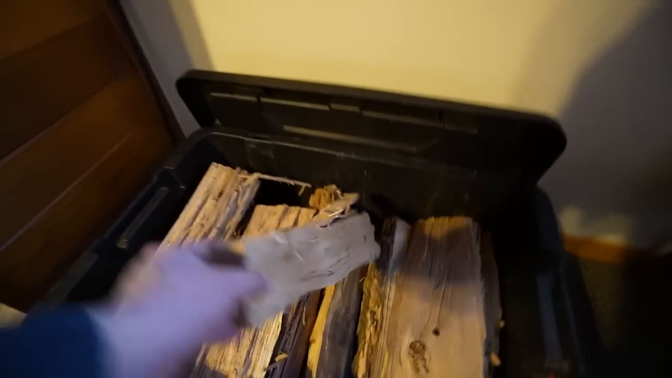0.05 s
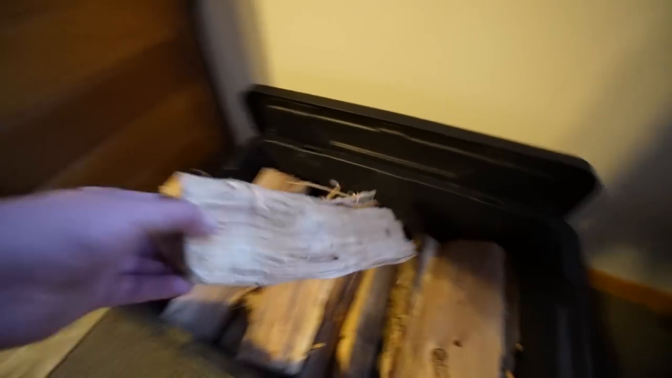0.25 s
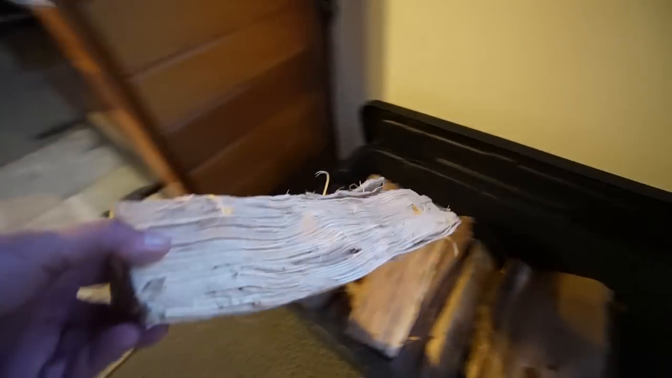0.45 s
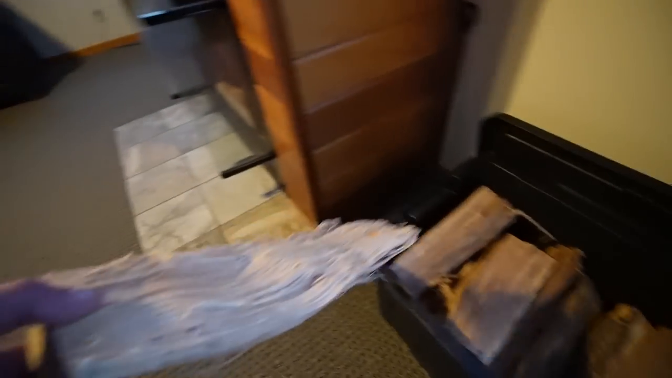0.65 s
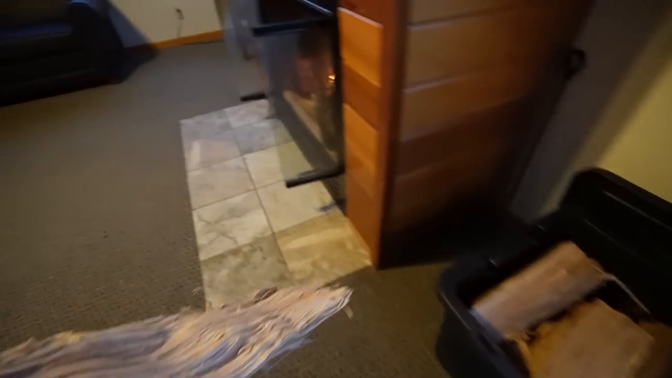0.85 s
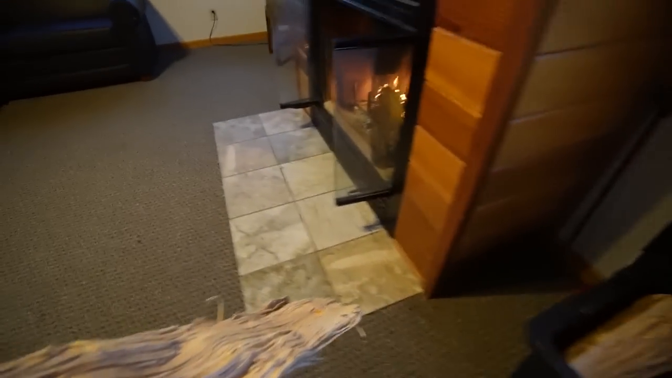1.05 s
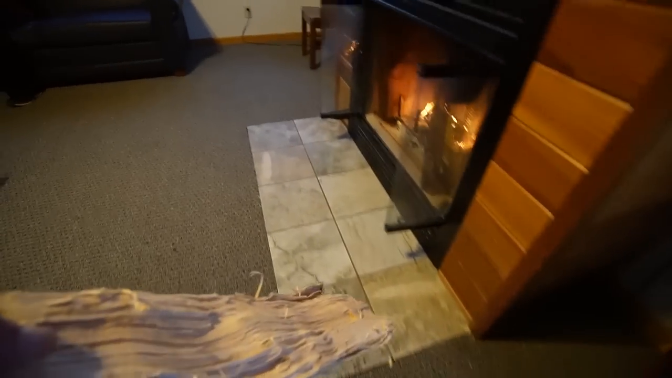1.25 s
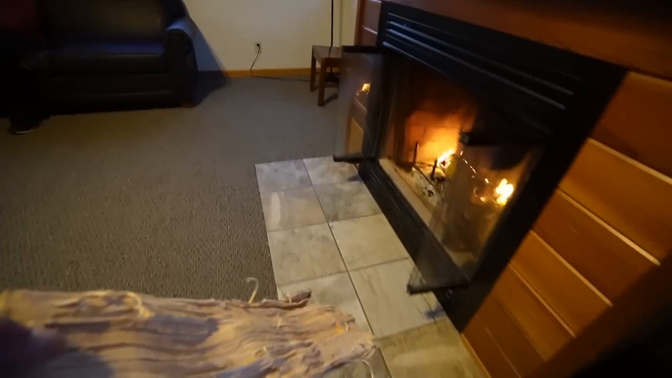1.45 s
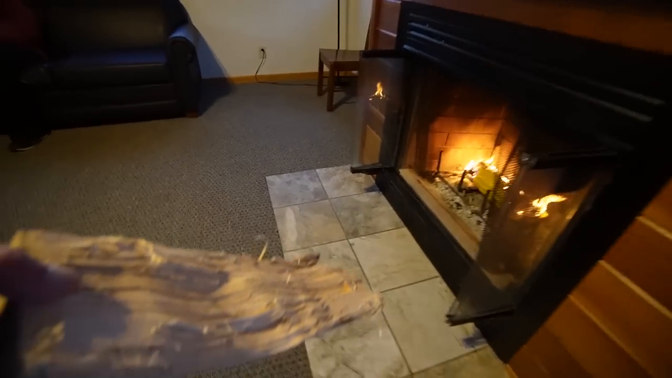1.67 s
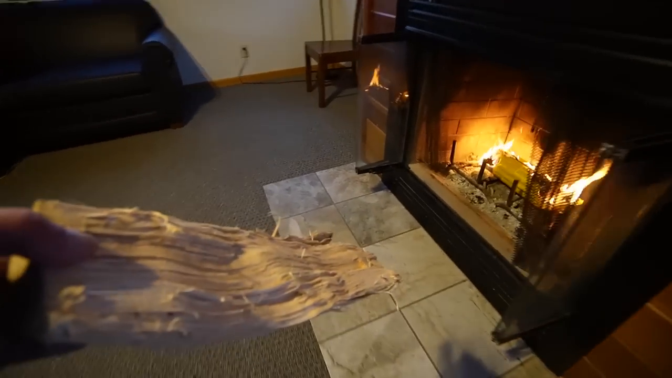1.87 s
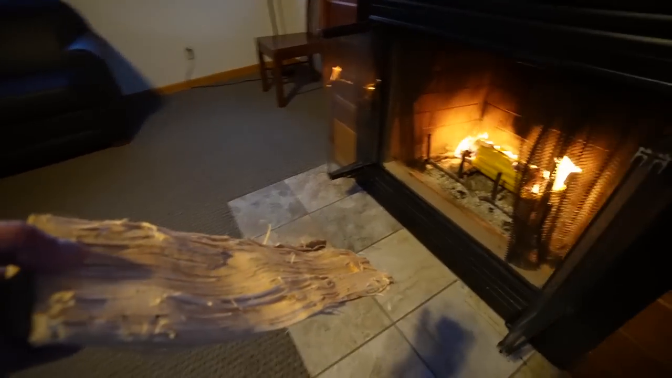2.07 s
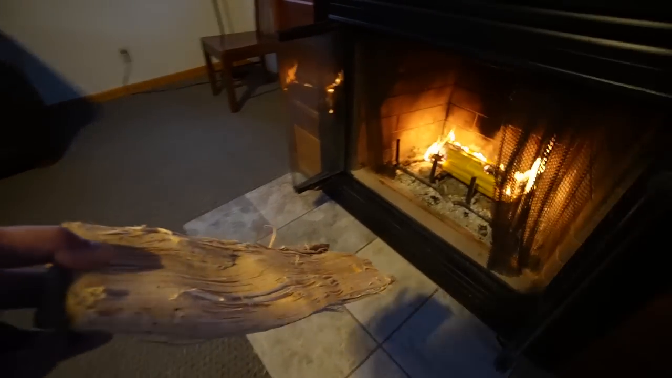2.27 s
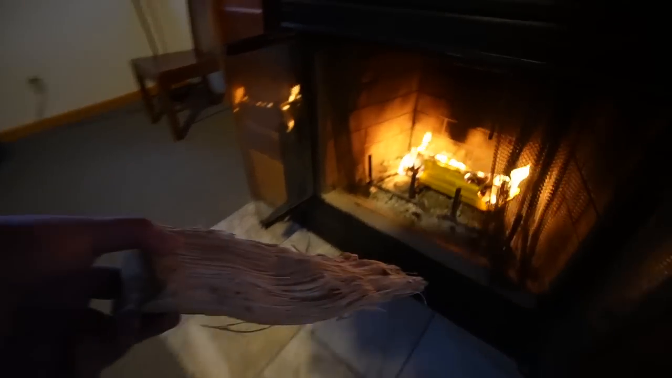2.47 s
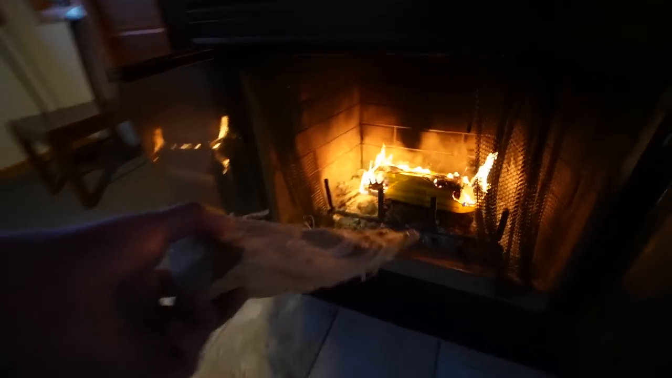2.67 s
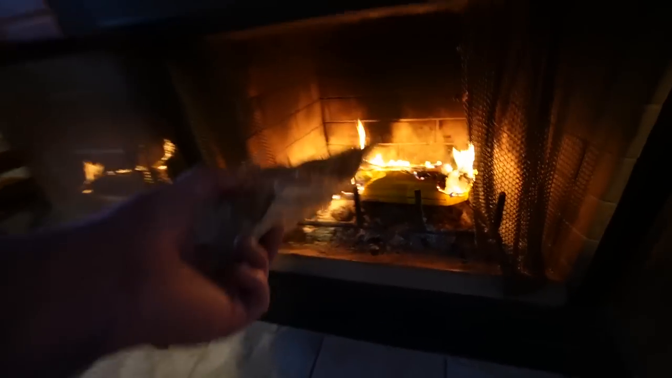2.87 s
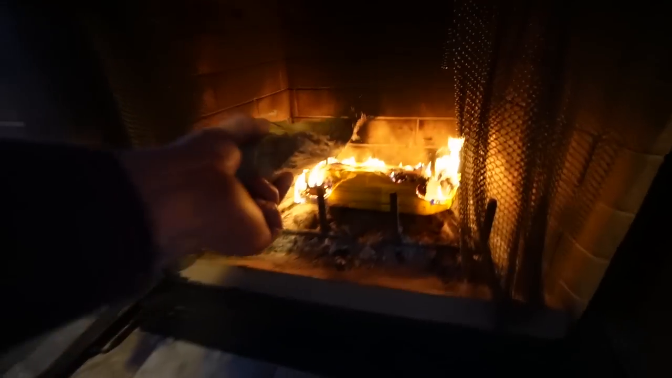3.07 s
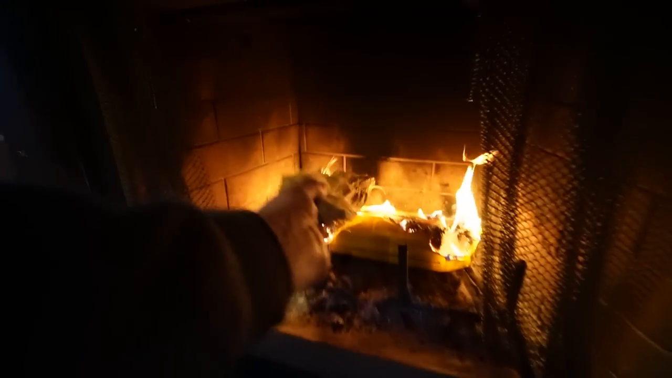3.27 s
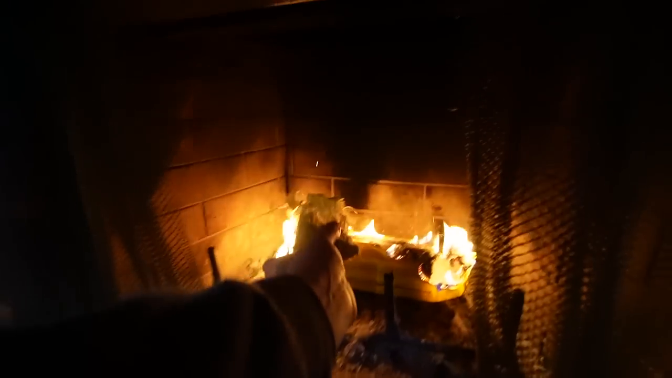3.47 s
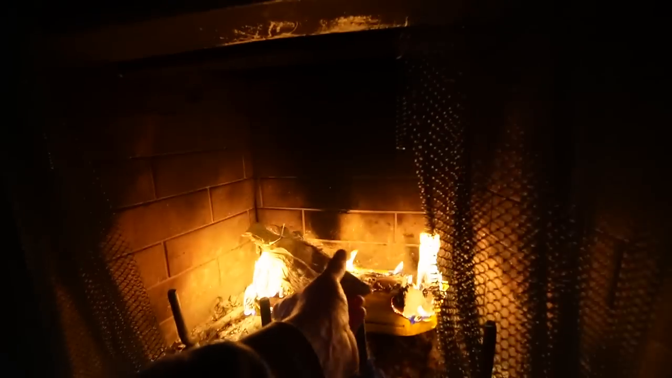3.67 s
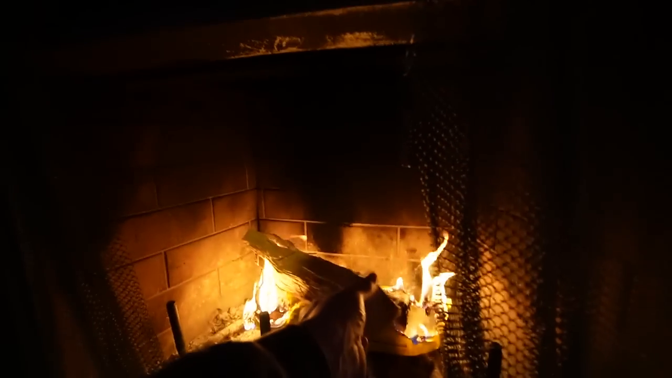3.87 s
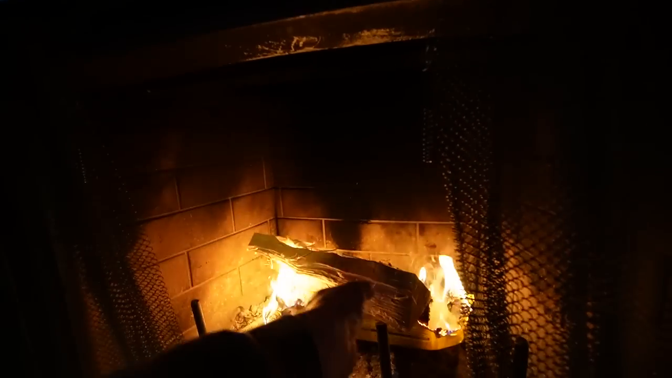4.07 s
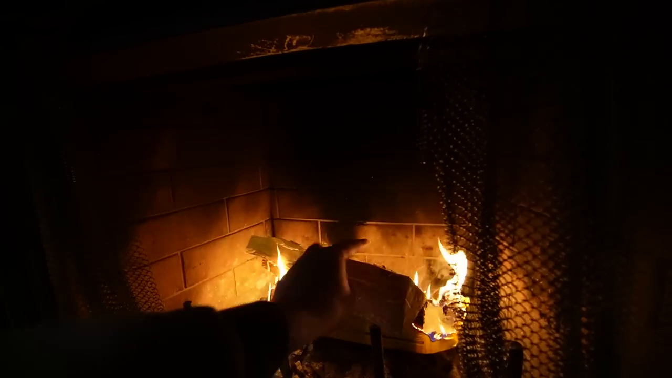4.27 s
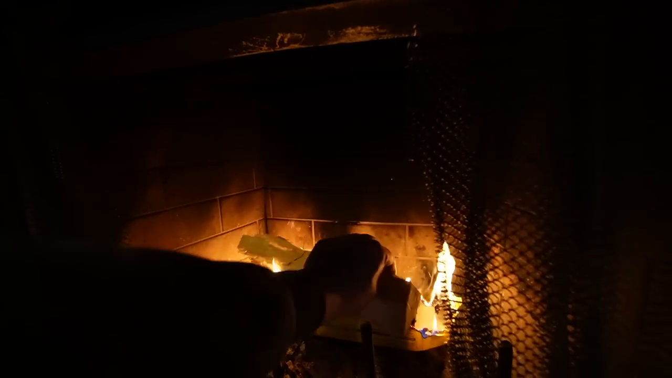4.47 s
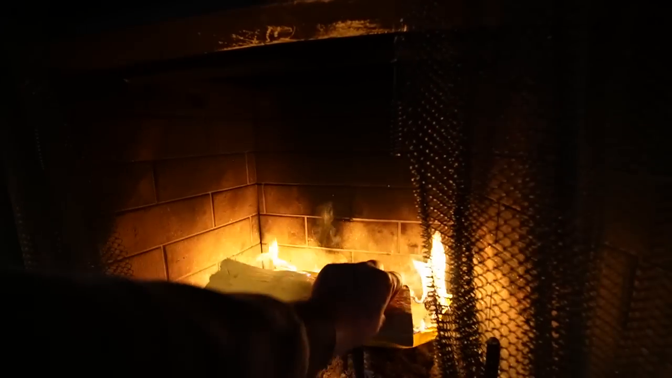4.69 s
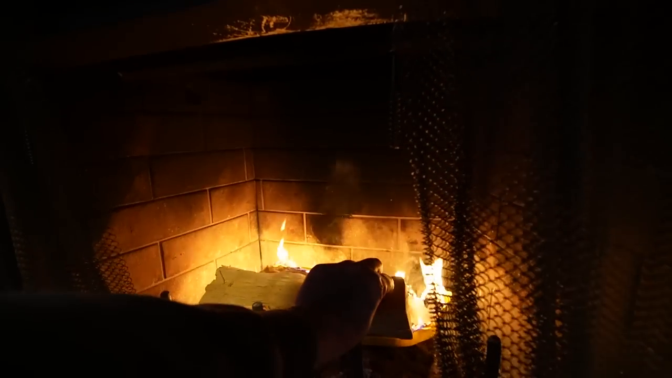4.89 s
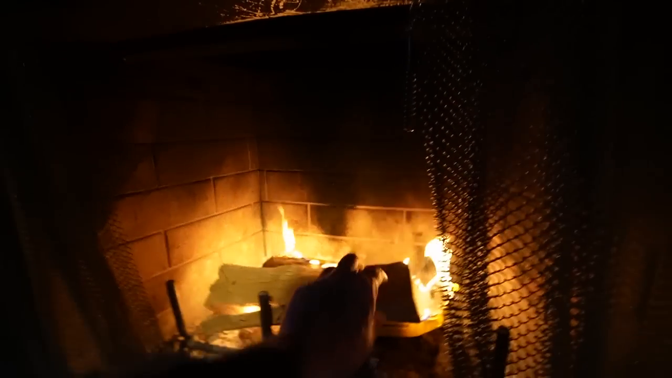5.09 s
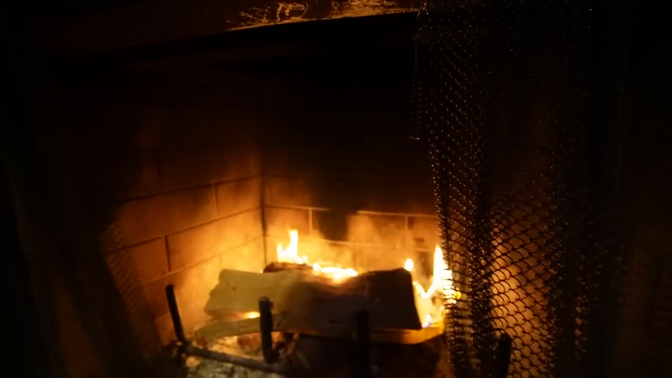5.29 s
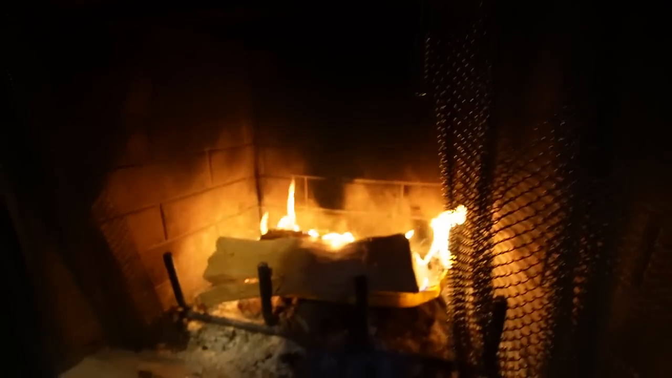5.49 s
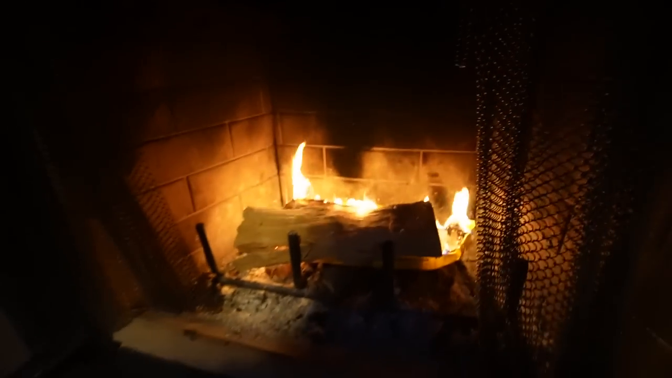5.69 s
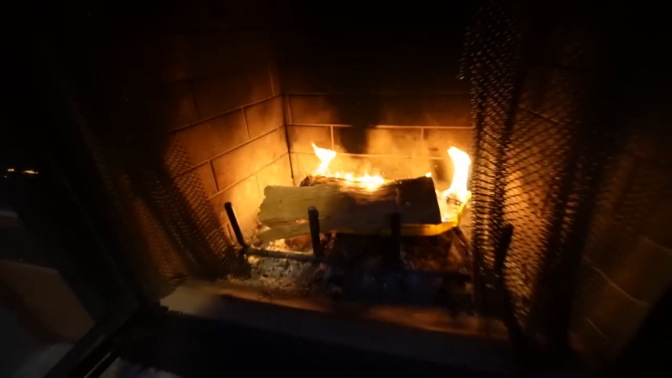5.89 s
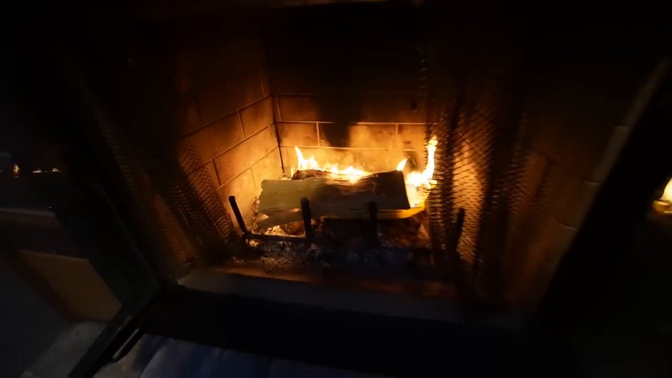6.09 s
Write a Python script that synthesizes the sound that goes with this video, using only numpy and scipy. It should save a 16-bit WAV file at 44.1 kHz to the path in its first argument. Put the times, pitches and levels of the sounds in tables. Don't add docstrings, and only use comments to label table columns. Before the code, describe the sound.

Woody clatter from a bin, a hushed carry with faint fire snaps, then splintery cracking, scraping and dull thuds as a log is shoved into flames.

```python
import sys
import numpy as np
from scipy import signal
from scipy.fft import rfft, irfft, next_fast_len
from scipy.io import wavfile
from scipy.ndimage import uniform_filter1d, map_coordinates

SR = 44100
rng = np.random.default_rng(int(sys.argv[2]) if len(sys.argv) > 2 else 0)


def magnitude_from_level(level_db):
    exponent = np.asarray(level_db, float) / 20
    return 10 ** exponent


def generate_wav(signal):
    frames = np.transpose(np.atleast_2d(signal))
    scaled = np.clip(frames, -1, 1) * 32767
    pcm = np.round(scaled).astype(np.int16)
    wavfile.write(sys.argv[1], SR, pcm)


N = 270759

# [t/s, peak/dB, brightness/dB, rattle t60/s, lowest mode/dB]
KNOCKS = [(0.036, -31.5, -11, 0.25, 11), (0.055, -38, 8, 0.097, 29), (0.088, -31, -2.5, 0.082, 0),
          (.097, -28, -19, 0.06, 12), (.166, -17.5, -32, 0.013, -21), (0.168, -14, -26.5, 0.023, -30),
          (0.173, -15, -7, 0.061, -4), (0.19, -12, -3, 0.071, 6), (0.214, -28.5, -32, 0.029, -20),
          (0.219, -27, -27.5, 0.03, 25), (0.495, -41, -38, 0.096, 11)]
# [f/Hz, width/Hz, level/dB]
LOG_MODES = [ (1191, 125, 0), (1500, 580, -4), (1780, 480, -4), (2300, 210, -1.5), (2550, 260, -6),
             (3250, 460, -10), (3800, 430, -8.5), (5080, 2360, -20)]
# [t/s, rise/s, fall/s, scrape/dB,
# dull body re scrape/dB]
STROKES = [(0.048, 0.075, 0.049, -35.5, -13.5), (0.504, 0.15, 0.07, -59.5, 7), (1.086, 0.066, 1, -60.5, 4),
           (2.1, 0.54, 0.46, -56, 2), (2.442, 0.014, 0.12, -50, 1.5), (3.446, 0.035, 0.32, -46, -25),
           (3.66, 0.031, 0.056, -53, -34), (3.766, 0.013, 0.022, -35, -42), (3.89, 0.038, 0.045, -34, -45),
           (3.991, 0.033, 0.16, -35.5, -42), (4.094, 0.03, 0.1, -37, -3.5),
           (4.547, 0.037, 0.057, -36, -6.5), (2.66, 0.26, 0.45, -57.5, 2), (4.7, 0.13, 0.064, -38, -13),
           (4.751, 0.028, 0.2, -33.5, 0.5), (4.85, 0.079, 0.046, -34, -15), (5.175, 0.31, 0.073, -47, -6.5),
           (5.3, 0.14, .6, -69, 4.5)]
# [f/Hz, level/dB]
SCRAPE_SPECTRUM = [(650, -36), (1100, -56), (1470, -12), (1570, 4), (2440, -1.5), (2700, 4.5), (3030, 2),
                   (3700, 0.5), (8000, -7.5), (10400, -13.5), (17600, -120)]
# [f/Hz, level/dB]
FIZZ_SPECTRUM = [(3500, -26), (6000, 7), (8000, -2), (11000, -7), (14000, -10), (15800, -25)]
# [f/Hz, level/dB]
DULL_SPECTRUM = [(450, -1.5), (650, 1.5), (1000, 1.5), (1400, 2), (1900, -21)]
# [t/s, length/s, f/Hz, width/Hz, level/dB]
SQUEAKS = [(3.697, 0.089, 1624, 83, -57), (3.726, 0.045, 4670, 294, -54.5), (3.846, 0.035, 4700, 350, -51),
           (3.975, 0.047, 1730, 432, -41), (4.977, 0.035, 3650, 150, -51.5),
           (5.019, 0.051, 3800, 500, -50.5), (5.064, 0.031, 3710, 90, -39.5),
           (5.094, 0.028, 3724, 710, -47), (5.12, 0.08, 3770, 2300, -42), (5.14, 0.009, 13700, 500, -49),
           (5.146, 0.01, 11200, 500, -38.5), (5.151, 0.027, 12400, 504, -50),
           (5.151, 0.019, 15700, 600, -38)]
# [t/s, length/s, f/Hz, width/Hz, level/dB]
GRINDS = [(0.083, 0.013, 2540, 700, -40), (0.212, 0.0061, 4300, 1200, -31.5),
          (0.342, 0.019, 3000, 400, -55), (1.328, 0.0096, 980, 1100, -56.5), (2.931, 0.01, 9550, 9000, -55),
          (3.167, 0.019, 4900, 3040, -45.5), (3.875, 0.018, 4600, 700, -48),
          (3.906, 0.025, 2360, 1500, -37), (4.727, 0.0082, 4900, 4950, -33),
          (4.736, 0.013, 3900, 1600, -25.5), (4.748, 0.0091, 6500, 3480, -30.5),
          (4.85, 0.012, 3800, 1500, -34), (4.851, 0.015, 5650, 800, -37), (4.867, 0.017, 3800, 610, -36),
          (5.173, 0.0088, 4280, 900, -44), (5.174, .012, 6500, 1500, -48), (0.168, 0.012, 3920, 900, -21.5),
          (0.165, 0.01, 2700, 900, -26), (3.833, 0.037, 3500, 600, -50.5), (3.944, .04, 3870, 504, -47),
          (4.98, 0.037, 5430, 400, -62), (5.06, 0.05, 5300, 400, -53.5), (4.984, 0.064, 1960, 500, -65),
          (3.679, 0.01, 6000, 12000, -42.5), (3.757, 0.012, 6040, 12000, -42.5),
          (4.148, 0.056, 8100, 9000, -56), (4.519, 0.026, 2450, 3000, -46), (.2, .012, 2300, 500, -39),
          (0.22, 0.011, 1177, 200, -32.5)]
# [t/s, peak/dB, ring f/Hz]
CRACKS = [(2.5556, -27.5, 4460), (2.973, -29.5, 5240), (3.039, -27.5, 5340), (3.0852, -24, 2270),
          (3.1383, -23, 5000), (3.1626, -23.5, 4700), (3.2214, -19, 4330), (3.238, -28, 3800),
          (3.438, -19.5, 3980), (3.487, -25.5, 5660), (3.6191, -19.5, 5570), (3.668, -27.5, 2980),
          (3.7073, -32, 4900), (3.7617, -56, 1760)]
# [t/s, peak/dB, ring f/Hz, rattle t60/s]
SPLINTERS = [(3.8407, -25, 3530, 0.0068), (3.863, -36, 3380, .01), (3.881, -30, 3590, 0.022),
             (3.916, -13, 2200, 0.02), (3.962, -23, 2800, .01), (4.0036, -23, 2500, 0.011),
             (4.061, -17.5, 2300, 0.016), (4.0973, -21.5, 2880, 0.027), (4.2303, -27.5, 3520, 0.015),
             (4.487, -42, 2940, 0.013), (4.5291, -27, 1957, 0.011), (4.5479, -18, 2220, 0.0071),
             (4.569, -15.5, 3030, 0.012), (4.704, -12.5, 2090, 0.017), (4.7405, -11.5, 4230, 0.0099),
             (4.7505, -12, 3650, .01), (4.7598, -8.5, 1350, 0.014), (4.7756, -13.5, 3340, 0.012),
             (4.7923, -18, 3160, 0.022), (4.8219, -14, 1700, 0.0061), (4.8373, -5, 3300, 0.01),
             (4.8418, -18.5, 3630, 0.0058), (4.8767, -20, 2170, 0.017), (5.617, -27, 4730, .01),
             (5.6577, -27.5, 1884, 0.012)]
# [t/s, peak/dB, clack re boom/dB, t60/s, main ring f/Hz]
THUDS = [(1.072, -54, 9, 0.28, 196), (1.277, -52, -17, 0.13, 463), (2.438, -54, -15, 0.13, 350),
         (2.604, -43, 5.5, 0.27, 297), (2.715, -46.5, -8, 0.39, 328), (2.873, -42.5, -11, 0.1, 213),
         (3.457, -50.5, 4, 0.74, 128), (4.008, -26, -16, 0.062, 302), (4.059, -34.5, -24, 0.45, 324),
         (4.108, -32, -11, 0.21, 400), (4.518, -37.5, -20, 0.3, 423), (4.734, -28.5, -22, 0.26, 450),
         (4.758, -21.5, 4, 0.52, 100), (5.659, -61, 11.5, 0.12, 77.8)]
# [f/Hz, width/Hz, level/dB]
BOX_MODES = [(69, 10, -5.5), (133.7, 41, 0), (186, 80, -4.5), (198, 74, -3), (319, 76, 2.5),
             (469, 108, 1.5)]
# [t/s, level/dB]
BIN_PUSHES = [
    (0.045, -41),
    (0.199, -59),
    (1.066, -55),
]
# [t/s, peak/dB, ring f/Hz]
TICKS = [(0.191, -11, 2300), (3.6436, -35, 2610), (3.7174, -40, 4600), (3.7438, -31.5, 1690),
         (3.785, -40, 2220), (4.1474, -17, 6650), (4.1944, -40, 6100), (4.236, -22, 5810),
         (4.5606, -28, 3770), (4.583, -28, 1950), (4.666, -27, 2020), (4.812, -23, 3580),
         (4.8554, -18, 3750), (4.9094, -31, 4000), (4.9314, -36, 3290)]
# [t/s, peak/dB, ring f/Hz, t60/s]
TAPS = [(.438, -53, 1010, .03), (1.328, -56, 900, .03), (.703, -53.5, 900, .04), (2.685, -52, 296, .08),
        (2.728, -65, 332, .06), (3.029, -55, 300, .06), (3.065, -55, 1480, 0.054), (3.91, -50, 460, 0.072),
        (4.012, -39, 786, 0.081), (4.066, -41, 800, .05), (4.733, -30.5, 170, 0.072),
        (4.778, -34, 790, .05), (4.786, -35, 430, .06), (4.815, -34, 440, .06), (4.873, -37, 1000, 0.04)]
# [t/s, peak/dB, ring f/Hz]
SPARKS = [(1.3135, -45, 4960), (1.532, -49, 10500), (1.543, -50, 11000), (2.776, -39, 13500),
          (3.324, -36, 7000), (3.402, -48, 7500), (3.656, -40, 11000), (4.3953, -37, 5500)]
# [t/s, peak/dB, body re spit/dB]
POPS = [(1.11, -53, -10), (1.268, -58, -15), (1.428, -54, -20), (1.438, -58, -18), (1.304, -53, 3),
        (1.4946, -50, -11), (1.5162, -35, -10), (1.567, -44, -14), (1.605, -47, -15),
        (1.7181, -55, -17), (1.7545, -57, -9), (1.784, -50, 2), (1.809, -41, -20), (1.8038, -45, -17),
        (1.8282, -31, -6.5), (1.8514, -34, -24), (1.911, -33, -12), (1.917, -38, -5),
        (1.9347, -31, -17), (1.944, -37, -6), (1.967, -29, -22), (2.09, -41, -10), (2.135, -42, 3.5),
        (2.158, -40, 0), (2.178, -45, 1), (2.207, -38.5, -6), (2.2433, -41, -23), (2.253, -48, -6),
        (2.3015, -38, -5), (2.356, -50, 2), (2.365, -39, -7), (2.41, -42, -1), (2.4909, -42.5, -10),
        (2.343, -37.5, -31), (2.3525, -35, -18), (2.386, -34, -34), (2.592, -44.5, 3),
        (2.7312, -46.5, 5), (2.774, -37, -28),
        (2.802, -38, -12), (2.8636, -40, 8), (2.875, -50, -13), (2.888, -33, -29), (2.923, -51, -17),
             (2.965, -42, -15), (2.934, -29, -33), (3.0689, -37, -10), (3.2209, -26, -2.5),
             (3.24, -29.5, -1), (3.488, -28.5, -18), (3.512, -30, -8), (3.62, -30, 2.5), (3.6564, -54, -7),
             (3.684, -43, 0), (3.764, -38, -10), (3.6013, -46, -8), (3.7995, -43, -9), (4.032, -37, 7.5),
             (4.085, -27.5, -17), (4.2304, -30.5, -13), (4.396, -37.5, -8), (4.549, -45, 13),
             (4.73, -45, 2), (4.7491, -41.5, 20.5), (4.9223, -27, -19), (4.949, -57, -9), (5.04, -51, -10),
             (5.052, -47, 12), (5.0965, -40.5, 6.5), (5.211, -41, -2), (5.2375, -44, -6),
             (5.2996, -54, 5.5), (5.3436, -52, -3), (5.3955, -51, -7.5), (5.6002, -49, -5),
             (5.6965, -46, 0.5), (5.994, -54, 3), (5.411, -46, -28), (5.5136, -44, -3), (5.6182, -44, 7.5),
             (5.724, -43, 5.5), (5.8353, -41, 3.5), (5.9595, -54, 12), (6.112, -50, 1)]
# [t/s, level/dB]
FLAME_LEVEL = [(0.0, -68), (0.42, -95), (0.8, -81), (1.05, -75), (1.5, -78), (1.8, -63), (2.67, -66.5),
               (2.91, -57.5), (3.79, -63), (4.05, -44), (4.24, -57.5), (4.55, -67), (4.7, -54), (4.98, -66),
               (5.28, -73.5), (6.14, -80)]
# [f/Hz, level/dB]
FLAME_SPECTRUM = [(3530, -12), (6000, -1.5), (7350, -3), (13900, -9), (15800, -12)]
# [t/s, rustle level/dB]
SLEEVE_LEVEL = [(0.08, -49), (0.48, -70), (0.84, -76.5), (1.8, -71), (2.02, -56.5), (2.36, -64),
                (2.67, -55), (2.91, -56), (3.79, -52.5), (4.05, -54), (4.24, -68), (4.55, -60), (4.7, -37),
                (4.98, -61), (5.28, -64), (6.14, -57.5)]
# [f/Hz, level/dB]
RUSTLE_SPECTRUM = [(760, -99), (1300, -7), (2180, 3), (2460, 1), (2680, 3.5), (4630, 3), (8000, -6.5),
                   (10400, -15), (17600, -120)]
# [t/s, level/dB, deep part re level/dB, t60/s]
SHUDDERS = [
    (0.06, -49.5, -8, 0.54),
    (1.07, -71, -9, 1.2),
    (1.898, -60.5, -24, 3.8),
    (2.5, -68, -8, 4.4),
    (2.89, -47.5, -5, 0.6),
    (3.47, -65, 18, 1.18),
    (4.018, -37, -8, 1.33),
    (4.516, -44, -6, 2.8),
    (4.75, -59, -16, 7.9),
]
# [f/Hz, level/dB]
RUMBLE_SPECTRUM = [(62, -19.5), (105, -9.5), (161, 0), (258, -8.5), (367, -3.5), (405, -9), (650, -28.5),
                   (840, -49), (1430, -120)]
# [f/Hz, level/dB]
DEEP_SPECTRUM = [(20, -31.5), (35, -30.5), (65, -11.5), (100, -15), (130, -20), (200, -59)]
# [t/s, level/dB, left re right/dB]
FAN_LEVEL = [
    (0, -51.5, 2),
    (.6, -65, 5),
    (1.2, -61.5, 3.5),
    (1.8, -61, 1.5),
    (2.6, -60.5, 5),
    (3.4, -65.5, 9),
    (5.2, -74, 13),
    (6.14, -66.5, 11),
]
# [f/Hz, level/dB]
AIR_SPECTRUM = [(25, -19), (150, 2), (480, -6), (800, -2.5), (1300, -14.5), (1850, 0.5), (2150, -0.5),
                (2750, -2.5), (3100, 9), (3350, -2.5), (5100, -20), (8000, -41), (12000, -71.5),
                (16000, -91.5)]
# [f/Hz, correlation/1]
NEAR_ALIKE = [(120, .9998), (300, .998), (600, .95), (1200, .95), (2500, .93), (5000, .8), (9000, .6),
              (14000, .3)]
# [f/Hz, correlation/1]
FAR_ALIKE = [(60, 0.97), (300, 0.84), (640, 0.8), (1400, 0.74), (3100, 0.73), (6800, 0.38), (15000, .2)]
# [f/Hz, t60/s]
ROOM_T60 = [(150, 0.46), (1200, 0.34), (2300, .42), (4000, 0.36), (12000, 0.36)]

FIZZ_DB, FIZZ_FOLLOWS = -15.5, 0.62
SOFT_DB, SOFT_MUTES = -22, 2.8
LEFT_DB_PER_KHZ = 0.84
CRACK_T60_S = 0.021
BIN_HZ, BIN_WIDTH_HZ, BIN_T60_S = 188, 71, 0.49
FAR_SPIT_HZ, FAR_PUFF, NEAR_SPIT_HZ, NEAR_PUFF = 9450, 0.072, 7100, 0.31
THIN_UNTIL_S = 2.05
TICKS_FROM_S, TICKS_GROW_S = 0.94, 0.65
CLOTH_DB, CLOTH_FOLLOWS = -66.5, 0.9
LEAN_S, LEAN_LASTS_S, LEAN_LOSS_DB = 1.8, 0.85, 15.5
SHUDDER_RISE_S = 0.033
UPPER_HZ, UPPER_LASTS = 234, 0.36
ROAR_DB, ROAR_FOLLOWS, ROAR_DEEP_DB = -67.5, 0.56, -12.5
TOP_HZ = 15900
LEFT_RIGHT = np.array([[0.5], [-0.5]])


def unit(x):
    return x / np.sqrt(np.mean(x ** 2) + 1e-20)


def peak(x):
    return x / np.abs(x).max()


def along(points, hz):
    f, v = np.transpose(points)
    return np.interp(np.log(hz + 1), np.log(f + 1), v)


def curves(rows):
    s, *cols = np.transpose(rows)
    return [np.interp(np.arange(N) / SR, s, c) for c in cols]


def wobble(rate_hz):
    knots = rng.standard_normal(int(N * rate_hz / SR) + 4)
    return map_coordinates(knots, [np.arange(N) * rate_hz / SR])


def swell(s, rise_s, fall_s):
    t = np.arange(N * 1000 // SR + 2) / 1000 - s
    return 20 * np.minimum(t / max(rise_s, 1e-3), -t / max(fall_s, 1e-3))


def fine(gain):
    return np.interp(np.arange(N) * 1000 / SR, np.arange(len(gain)), gain)


def filtered(x, response):
    n = x.shape[-1]
    m = next_fast_len(n + min(n // 2, 8192))
    return irfft(rfft(x, m) * response(np.fft.rfftfreq(m, 1 / SR)), m)[..., :n]


def resonance(f, hz, width_hz):
    return 1j * f * width_hz / (hz * hz - f * f + 1j * f * width_hz)


def modal(f, modes):
    return sum((-1) ** k * magnitude_from_level(db) * resonance(f, hz, w) for k, (hz, w, db) in enumerate(modes))


def add(out, s, sound):
    part = out[..., round(s * SR):][..., :sound.shape[-1]]
    part += sound[..., :part.shape[-1]]


def placed(x, pan_db, lag_s):
    def ports(f):
        shade = magnitude_from_level(LEFT_RIGHT * pan_db * f / (f + 2500))
        return shade * np.exp(2j * np.pi * f * (LEFT_RIGHT * lag_s - 8 / SR))
    return filtered(x, ports)


def scattered(x, pan_spread_db, lag_spread_s):
    return placed(x, *(rng.standard_normal(2) * [pan_spread_db, lag_spread_s]))


def burst(click_s, puff, puff_s, front=3):
    t = np.arange(2048) / SR
    noise = rng.standard_normal(len(t))
    noise[0] = front
    return noise * (magnitude_from_level(-60 * t / click_s) + puff * magnitude_from_level(-60 * t / puff_s))


def rush(spectrum, grain_db, grain_hz, patchy_db=None, alike=NEAR_ALIKE):
    pair = rng.standard_normal((2, N), dtype=np.float32)
    if patchy_db:
        z = signal.stft(pair, nperseg=256)[2]
        field = rng.standard_normal(z.shape[1:], dtype=np.float32)
        field = uniform_filter1d(uniform_filter1d(field, size=2, axis=0), size=11, axis=1)
        pair = signal.istft(z * magnitude_from_level(patchy_db * unit(field)), nperseg=256)[1][:, :N]

    def colour(f):
        turn = np.arccos(np.clip(along(alike, f), -1, 1)) / 2
        return magnitude_from_level(along(spectrum, f)) * np.array([np.cos(turn), np.sin(turn)])
    mid, side = filtered(pair * magnitude_from_level(grain_db * wobble(grain_hz)), colour)
    return unit(np.array([mid + side, mid - side]))


def knocks():
    out, t = np.zeros(N), np.arange(SR // 8) / SR
    for s, db, bright_db, t60_s, low_db in KNOCKS:
        rattle = rng.standard_normal(len(t)) * magnitude_from_level(-60 * t / t60_s)
        gains_db = np.r_[low_db, rng.normal(0, 2.5, len(LOG_MODES) - 1)]
        modes = [(hz, w, level + g) for (hz, w, level), g in zip(LOG_MODES, gains_db)]
        wood = filtered(rattle, lambda f: modal(f, modes) * (f / (f - 800j)) ** 3)
        crack = filtered(rattle * magnitude_from_level(-60 * t / 0.047),
                         lambda f: resonance(f, 5000, 5900) ** 2 / (1 + 1j * f / 6500) ** 2)
        add(out, s, magnitude_from_level(db) * (peak(wood) + magnitude_from_level(bright_db) * peak(crack)))
    return out


def rubbing():
    scrape = fizz = dull = 0
    for s, rise_s, fall_s, db, dull_db in STROKES:
        below_db = swell(s, rise_s, fall_s)
        muted_db = SOFT_MUTES * max(dull_db - SOFT_DB, 0)
        scrape = scrape + magnitude_from_level(db + below_db)
        dull = dull + magnitude_from_level(db + below_db + dull_db)
        fizz = fizz + magnitude_from_level(db + FIZZ_DB + FIZZ_FOLLOWS * below_db - muted_db)
    catches = fine(scrape) * magnitude_from_level(-3.0) * rush(SCRAPE_SPECTRUM, 1.8, 220, 3.5)
    hiss = fine(fizz) * magnitude_from_level(0.5) * rush(FIZZ_SPECTRUM, 1.0, 310, 4)
    return catches + hiss + fine(dull) * magnitude_from_level(-10.0) * rush(DULL_SPECTRUM, 1.4, 120)


def squeaks():
    out, t = np.zeros((2, N)), np.arange(SR // 8) / SR
    for s, length_s, hz, width_hz, db in SQUEAKS + GRINDS:
        pan_db = LEFT_DB_PER_KHZ * max(hz - 4000, 0) / 1000
        slip = filtered(rng.standard_normal(len(t)), lambda f: resonance(f, hz, width_hz) ** 2)
        envelope = np.sin(np.pi * np.clip(t / length_s, 0, 1)) ** 0.5
        add(out, s, magnitude_from_level(db) * placed(unit(slip) * envelope, pan_db, 1e-5 * pan_db))
    return out


def cracks():
    out = np.zeros((2, N))
    for s, db, hz, t60_s in [row + (CRACK_T60_S,) for row in CRACKS] + SPLINTERS:
        def splinter(f):
            ring = resonance(f, hz, 0.38 * hz) * resonance(f, hz, 4.7 * hz)
            return ring * (f / (f - 0.45j * hz)) ** 2 / (1 + 1j * f / 6000)
        snap = filtered(burst(t60_s, 0.1, 0.045, front=3.5), splinter)
        add(out, s, magnitude_from_level(db - 7.0) * scattered(peak(snap), 1.1, 2e-5))
    return out


def thuds():
    out, t = np.zeros(N), np.arange(SR * 3 // 4) / SR
    push = 4 * magnitude_from_level(-60 * t / 0.012)
    short = SR // 8
    for s, db, clack_db, t60_s, hz in THUDS:
        shake = rng.standard_normal((3, len(t)))
        deep = filtered(shake[0] * (magnitude_from_level(-60 * t / (2.1 * t60_s)) + push), lambda f: modal(f, BOX_MODES[:3]))
        upper = filtered(shake[1] * (magnitude_from_level(-60 * t / (1.5 * t60_s)) + push), lambda f: modal(f, BOX_MODES[3:]))
        boom = filtered(deep + upper, lambda f: resonance(f, hz, 0.5 * hz))
        clack = filtered(shake[2, :short] * magnitude_from_level(-60 * t[:short] / 0.07),
                         lambda f: resonance(f, 750, 1320) ** 2)
        add(out, s, magnitude_from_level(db) * peak(boom))
        add(out, s, magnitude_from_level(db + clack_db) * peak(clack))
    return out


def bin_wall():
    out, t = np.zeros(N), np.arange(SR // 2) / SR
    for s, db in BIN_PUSHES:
        hum = filtered(rng.standard_normal(len(t)), lambda f: resonance(f, BIN_HZ, BIN_WIDTH_HZ) ** 2)
        add(out, s, magnitude_from_level(db - 60 * t / BIN_T60_S) * unit(hum) * (1 - np.exp(-t / 0.015)))
    return out


def taps():
    out = np.zeros((2, N))
    for s, db, hz in TICKS:
        ring = filtered(burst(0.0088, 0.05, 0.03, front=3.1),
                        lambda f: resonance(f, hz, 0.32 * hz) * resonance(f, hz, 5.0 * hz))
        add(out, s, magnitude_from_level(db - 10.5) * scattered(peak(ring), 1.1, 2e-5))
    for s, db, hz, t60_s in TAPS:
        ring = filtered(burst(0.018, 0.87, t60_s),
                        lambda f: resonance(f, hz, 0.28 * hz) * resonance(f, hz, 2.1 * hz))
        add(out, s, magnitude_from_level(db) * scattered(peak(ring), 3.5, 4e-5))
    for s, db, hz in SPARKS:
        snap = filtered(burst(0.004, 0.093, 0.03), lambda f: resonance(f, hz, hz) ** 2)
        add(out, s, magnitude_from_level(db) * placed(peak(snap), 1, 0))
    return out


def pops():
    out = np.zeros((2, N))
    for s, db, body_db in POPS:
        hz, puff = (FAR_SPIT_HZ, FAR_PUFF) if s < THIN_UNTIL_S else (NEAR_SPIT_HZ, NEAR_PUFF)
        blast = burst(0.004, puff, 0.038, front=1.44)
        spit = filtered(blast, lambda f: resonance(f, hz, 1.03 * hz) ** 2)
        body = filtered(blast, lambda f: resonance(f, 4580, 5200) ** 2)
        pan_db, lag_s = rng.standard_normal(2) * [1.5, 2.5e-5] + [1.1, 0]
        pop = peak(spit) + magnitude_from_level(body_db + 3.5) * peak(body)
        add(out, s, magnitude_from_level(db + 0.5) * placed(pop, pan_db, lag_s))
    return out


def lean():
    return np.clip((np.arange(N) / SR - LEAN_S) / LEAN_LASTS_S, 0, 1)


def flames():
    strength = magnitude_from_level(2.5 * rng.exponential(size=N).clip(0, 2)) * rng.standard_normal(N)
    ticks = (rng.random(N) < 260 / SR) * strength
    ticks = placed(filtered(ticks, lambda f: resonance(f, 9200, 7600) ** 2), 0.31, 2e-5)
    in_view = np.clip((np.arange(N) / SR - TICKS_FROM_S) / TICKS_GROW_S, 0, 1)
    hiss = rush(FLAME_SPECTRUM, 1, 450, 1.5) + magnitude_from_level(-3.0 - 5.8 * lean()) * in_view * unit(ticks)
    return magnitude_from_level(curves(FLAME_LEVEL)[0]) * hiss


def sleeve():
    rustle_db = curves(SLEEVE_LEVEL)[0]
    dull_db = CLOTH_DB + CLOTH_FOLLOWS * (rustle_db + 59.5) - LEAN_LOSS_DB * lean()
    rustle = magnitude_from_level(rustle_db) * rush(RUSTLE_SPECTRUM, 2.6, 130, 2.3)
    return rustle + magnitude_from_level(dull_db) * rush(DULL_SPECTRUM, 0.6, 34, 5.5)


def rumble():
    roar = magnitude_from_level(ROAR_DB + ROAR_FOLLOWS * (curves(FLAME_LEVEL)[0] + 64.5))
    body = upper = deep = 0
    for s, db, deep_db, t60_s in SHUDDERS:
        shudder = magnitude_from_level(db + swell(s, SHUDDER_RISE_S, t60_s / 3))
        body = body + shudder
        upper = upper + magnitude_from_level(db - 1.0 + swell(s, SHUDDER_RISE_S, UPPER_LASTS * t60_s / 3))
        deep = deep + magnitude_from_level(deep_db) * shudder
    noise = rush(RUMBLE_SPECTRUM, 2.4, 25)
    high = filtered(noise, lambda f: 1 / (1 + (UPPER_HZ / (f + 1)) ** 6))
    mix = (roar + fine(body)) * (noise - high) + (roar + fine(upper)) * high
    mix = mix + (roar * magnitude_from_level(ROAR_DEEP_DB) + fine(deep)) * rush(DEEP_SPECTRUM, 2.8, 5.9)
    return magnitude_from_level(-4.0) * mix


def room(x):
    hz, t, z = signal.stft(rng.standard_normal((2, SR * 2 // 3)), SR, nperseg=256)
    decay = magnitude_from_level(-60 * t / along(ROOM_T60, hz)[:, None])
    mid, side = signal.istft(z * decay, SR, nperseg=256)[1]
    tail = mid + 0.5 * LEFT_RIGHT * filtered(side, lambda f: f / (f + 450))
    late = np.pad(x, (200, 0))[None]
    return signal.fftconvolve(late, tail / np.linalg.norm(mid), axes=1)[:, :N]


def fan():
    level_db, pan_db = curves(FAN_LEVEL)
    air = rush(AIR_SPECTRUM, 0.8, 8.8, 0.6, FAR_ALIKE)
    bass = filtered(air, lambda f: 1 / (1 + (f / 900) ** 2))
    return magnitude_from_level(level_db) * (bass + magnitude_from_level(LEFT_RIGHT * pan_db) * (air - bass))


def scene():
    wood, snaps, blows = knocks(), pops() + cracks(), thuds()
    near = placed(wood, 1.4, 1.5e-5) + snaps + blows + squeaks() + rubbing() + bin_wall() + taps()
    echo = room(magnitude_from_level(-10.5) * blows + magnitude_from_level(-9.0) * wood + magnitude_from_level(-8.0) * snaps.mean(axis=0))
    return near + echo + flames() + sleeve() + rumble() + fan()


def band_limit(x):
    return signal.sosfilt(signal.butter(12, 16850, fs=SR, output="sos"), x)


def record(dry):
    mix = filtered(dry, lambda f: 1 / (1 + (f / TOP_HZ) ** 400))
    return band_limit(mix)


dry = scene()
out = record(dry)
generate_wav(out)
```